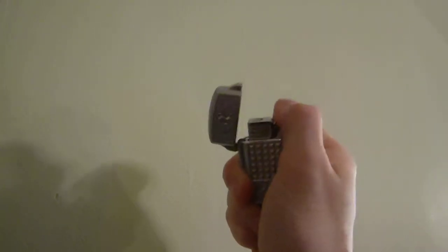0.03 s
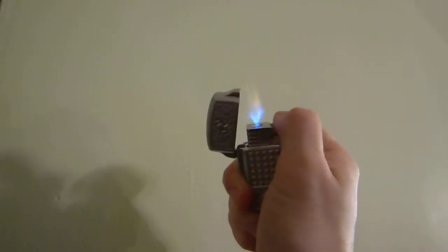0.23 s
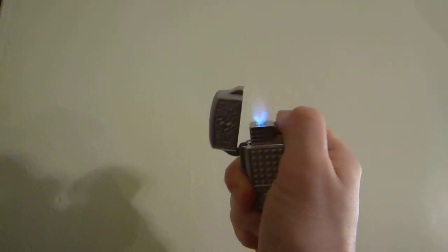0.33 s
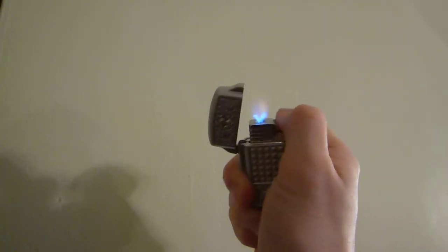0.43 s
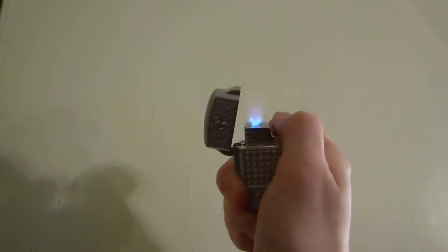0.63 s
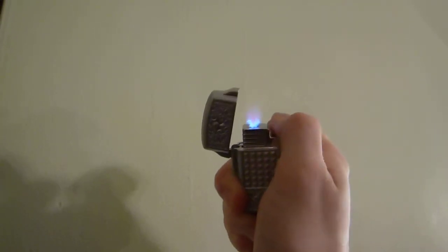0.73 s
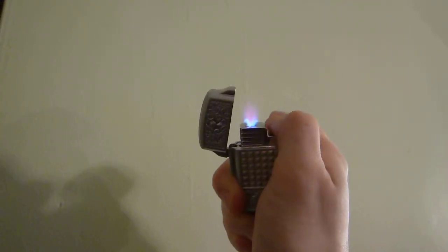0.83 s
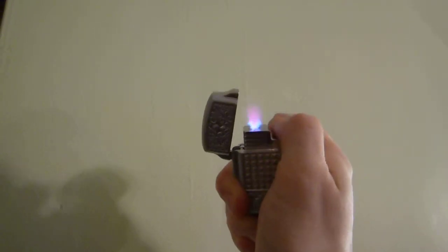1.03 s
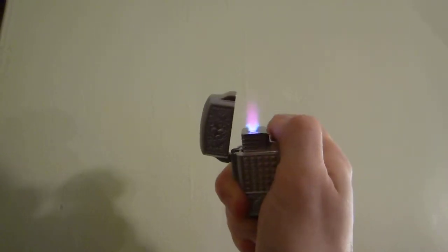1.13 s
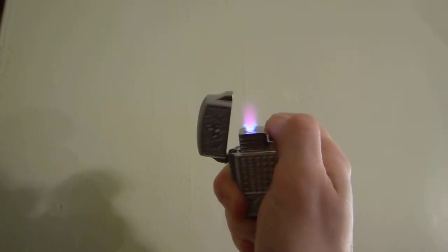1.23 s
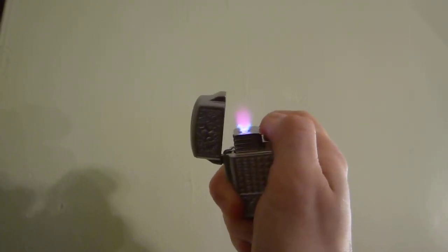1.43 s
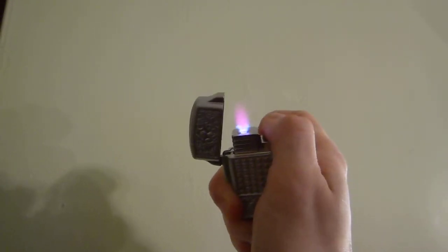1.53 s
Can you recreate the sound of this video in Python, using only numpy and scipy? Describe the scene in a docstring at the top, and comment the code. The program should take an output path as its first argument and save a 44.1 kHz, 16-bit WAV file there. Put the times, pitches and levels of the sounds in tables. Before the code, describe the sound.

A metal jet lighter is lit close to the microphone in a small room. Faint gas hisses at first. At 0.2 seconds the igniter gives one loud, sharp metallic click with a short room echo. The flame catches at once, flares briefly and settles by about 0.5 seconds into a steady, much quieter hiss over a soft, hollow, fluttering roar with tiny sputters, lasting until about 1.6 seconds.

```python
"""A metal jet lighter, close to the microphone, in front of a wall in a small room. First unlit gas hisses
over the low room tone. At 0.2 s the piezo igniter snaps and rings the case; wall, hand and room throw
the snap back, and the narrow-band recorder overloads, ducks and recovers. The flame catches, flares
a little and settles into a fluttering roar under the hiss of the jet."""
import sys
import numpy as np
from scipy import signal
from scipy.fft import rfft, irfft
from scipy.io import wavfile
from scipy.ndimage import uniform_filter1d

SR = 44100
rng = np.random.default_rng(int(sys.argv[2]) if len(sys.argv) > 2 else 0)


def pcm_store(signal):
    """Save signal as 16-bit PCM."""
    levels = np.round(np.clip(np.atleast_2d(signal), -1, 1) * 32767)
    wavfile.write(sys.argv[1], SR, levels.astype(np.int16).T)


N = 70560
TIME = np.arange(N) / SR

SNAP_S, SNAP_DB = .1997, .5   # the igniter's hammer strikes
CATCH_S = .033   # time constant: gas hiss gives way to flame
GAS_DB, ROAR_DB, JET_DB = -48.5, -44.5, -42.5

# modes of the metal case, one list each: f/Hz, level/dB re the snap, t60/s
CASE_MODE_HZ = [2100, 2295, 2430, 2845, 3135, 3360, 3772, 4130, 4928, 5190, 5700, 7220, 7680]
CASE_MODE_DB = [-16.5, -24, -20, -15, -15, -9, 0.5, -29.5, -15, -18.5, -21.5, -9, -7.5]
CASE_MODE_T60_S = [.022, 0.047, 0.013, .022, 0.036, .018, 0.019, .015, 0.012, 0.029, .014, 0.0096, 0.0065]
# low jolt of the lighter in the hand: f/Hz, level/dB re the snap, t60/s
JOLT_MODES = [(120, -45, 0.0294), (215, -30, .025), (345, -26.5, 0.033)]
# noise colours of unlit gas, flame roar and burning jet: f/Hz, relative level/dB
GAS_SPECTRUM = [(500, -8), (800, -6.5), (1400, -7.5), (2050, 0.5), (2450, -5), (2750, -7.5), (3300, -9),
                (3800, 1), (4400, -17), (5300, -19.5), (6000, -7), (6600, -4), (7750, -9), (9000, -15.5)]
ROAR_SPECTRUM = [(60, -16.5), (100, -17), (150, -2), (210, 2), (300, -4.5), (450, 1), (620, -2),
                 (750, -4.5), (900, -16.5)]
JET_SPECTRUM = [(700, -6), (950, -4), (1300, -1), (1600, -1.5), (2100, 0), (2620, -12.5), (3100, -6),
                (3600, 0), (4120, -1.5), (4600, -17.5), (5350, -20), (5900, -12.5), (6400, -13),
                (7050, -21.5), (7450, -18), (8300, -24), (9000, -31.5)]
# strength of the roar: t/s, level/dB re steady burning
ROAR_CURVE = [(.2, 15), (.26, 4), (.33, 1.5), (.39, 3.5), (.425, 1.5), (.5, 1), (.56, -3), (.63, -4),
              (.675, 1.5), (.8, 1.5), (1.1, -1), (1.16, 2), (1.25, -3.5), (1.31, 2), (1.365, -3),
              (1.42, -1), (1.6, -1)]
# strength of the jet's top hiss: t/s, relative level/dB
TOP_HISS_CURVE = [(.3, 1), (.75, -0.5), (.9, -0.5), (1.03, -3), (1.17, 1), (1.6, 0)]
# hollow resonances that the jet excites: f/Hz, width/Hz, level/dB at steady burning
HOLLOW_BANDS = [(345.4, 105, -45.5), (569.3, 65, -51), (770, 75, -55.5), (969, 50, -56.5), (1157, 60, -55),
                (1323, 49, -56), (2300, 90, -65.5)]
# sputters of the flame: t/s, f/Hz, level/dB, half length/s
SPUTTERS = [(0.312, 200, -40.5, .01), (.318, 400, -39.5, 0.013), (0.457, 390, -34, 0.0065),
            (0.762, 75, -47.5, 0.0073), (0.874, 390, -35, 0.0093), (1.433, 342.6, -42, 0.041)]
# reflections off wall and hand: delay/s, level/dB re the direct snap
REFLECTIONS = [(.0053, -12.5), (.0074, -19.5)]
# noise colours of the reverberation and the room tone: f/Hz, relative level/dB
REVERB_SPECTRUM = [(300, -36.5), (1000, -23), (2000, -10.5), (2450, -16), (2900, -4.5), (3400, 1.5),
                   (3780, 2.5), (4100, -9.5), (4500, -16.5), (4900, -12), (5200, -15.5), (5650, -12),
                   (6050, -22.5), (6900, -12), (7350, -10), (7950, -22.5), (8300, -20.5), (9000, -25)]
ROOM_TONE_SPECTRUM = [(20, -13), (40, -16), (65, -3.5), (90, -5), (120, 0.5), (165, -3), (230, 2.5),
                      (330, -1), (600, -8)]


def igniter(crack_db=-9.5):
    """Blow and spark give a broad crack; the case rings and jolts in the hand."""
    burst = rms_one(low_pass(rng.standard_normal(N), hz=6860))
    crack = from_db(crack_db) * burst * dying(t60=.01)
    case = ring(zip(CASE_MODE_HZ, CASE_MODE_DB, CASE_MODE_T60_S))
    return from_db(SNAP_DB) * (crack + case + ring(JOLT_MODES))


def ring(modes):
    """Damped sines of alternating sign, set off by the snap."""
    return sum((-1) ** k * from_db(db) * dying(t60) * np.sin(2 * np.pi * hz * since_snap())
               for k, (hz, db, t60) in enumerate(modes))


def burner():
    """Thin gas hiss until the spark; then the flame takes over."""
    lit = 1 - np.exp(-since_snap() / CATCH_S)
    gas = from_db(GAS_DB) * noise(GAS_SPECTRUM)
    return (1 - lit) * gas + lit * (roar() + jet()) + sputters()


def roar(flutter_db=.78):
    """The flame's low noise and hollow resonances swell and flutter together."""
    strength_db = np.interp(TIME, *np.transpose(ROAR_CURVE)) + flutter_db * drift(hz=28)
    rumble = from_db(ROAR_DB) * noise(ROAR_SPECTRUM)
    hollows = sum(from_db(db) * hollow(hz, width) for hz, width, db in HOLLOW_BANDS)
    return from_db(strength_db) * (rumble + hollows)


def hollow(hz, width, waver_share=.015):
    """A narrow, noisy resonance whose centre wavers; rms 1."""
    phase = 2 * np.pi * np.cumsum(hz * (1 + waver_share * drift(hz=6.05))) / SR
    return rms_one(drift(width / 2) * np.cos(phase) + drift(width / 2) * np.sin(phase))


def jet(top_above_hz=4700, sag_db_per_s=.5):
    """The burning jet starts strong and settles; its top hiss slowly wavers."""
    hiss = noise(JET_SPECTRUM)
    top = irfft(rfft(hiss) * (np.fft.rfftfreq(N, 1 / SR) > top_above_hz), N)
    top_gain = from_db(np.interp(TIME, *np.transpose(TOP_HISS_CURVE)))
    flare_db = np.interp(TIME, [.475, .507], [2, 0])
    level_db = JET_DB + flare_db - sag_db_per_s * (TIME - TIME.mean())
    return from_db(level_db) * (hiss - top + top * top_gain)


def sputters():
    """At each sputter the flame briefly swells on one low pitch."""
    sound = np.zeros(N)
    for at_s, hz, db, half_length_s in SPUTTERS:
        swell = np.exp(-.5 * ((TIME - at_s) / half_length_s) ** 2)
        sound += from_db(db) * swell * np.sin(2 * np.pi * (hz * TIME + rng.random()))
    return sound


def with_reflections(snap):
    """The direct snap, then its bounces off the nearby wall and hand."""
    return snap + sum(from_db(db) * np.interp(TIME - delay, TIME, snap, left=0)
                      for delay, db in REFLECTIONS)


def room_tail(level_db=-21.5, build_s=.019):
    """The snap's diffuse reverberation builds up and dies in the small room."""
    build = 1 - np.exp(-since_snap() / build_s)
    return from_db(level_db) * noise(REVERB_SPECTRUM) * build * dying(t60=.43)


def room_tone(level_db=-54):
    """The room's steady low background."""
    return from_db(level_db) * noise(ROOM_TONE_SPECTRUM)


def from_db(db):
    """Decibels to gain."""
    return 10 ** (np.asarray(db) / 20)


def rms_one(x):
    """Scale to rms 1."""
    return x / np.sqrt(np.mean(x ** 2) + 1e-20)


def low_pass(x, hz, order=2):
    """Butterworth low-pass."""
    return signal.sosfilt(signal.butter(order, hz, fs=SR, output="sos"), x)


def noise(spectrum):
    """Noise of a given colour, falling 60 dB an octave beyond its ends; rms 1."""
    hz, db = np.transpose(spectrum)
    octave, known = np.log2(np.fft.rfftfreq(N, 1 / SR) + 1), np.log2(hz)
    beyond = np.abs(octave - np.clip(octave, known[0], known[-1]))
    gain = from_db(np.interp(octave, known, db) - 60 * beyond)
    return rms_one(irfft(rfft(rng.standard_normal(N)) * gain, N))


def drift(hz):
    """Random wander, mostly slower than hz; rms 1."""
    return rms_one(low_pass(rng.standard_normal(2 * N), hz)[N:])


def since_snap():
    """Seconds since the snap, zero before it."""
    return np.maximum(TIME - SNAP_S, 0)


def dying(t60):
    """Envelope that starts at the snap and falls 60 dB in t60 seconds."""
    return (TIME > SNAP_S) * from_db(-60 * since_snap() / t60)


def scene():
    """Lighter, reflections and room as they reach the microphone, in mono."""
    return (with_reflections(igniter()) + burner() + room_tail() + room_tone())[None]


def gain_control(x, threshold_db=-19.5, duck_share=.54, attack_s=.01, recover_db_per_s=108):
    """The recorder ducks quickly on a loud sound and climbs back at a steady rate."""
    level_db = 10 * np.log10(np.abs(uniform_filter1d(x ** 2, size=64)) + 1e-12)
    duck_db = duck_share * np.maximum(level_db - threshold_db, 0)
    recovery_db = recover_db_per_s * TIME
    held_db = np.maximum.accumulate(duck_db + recovery_db) - recovery_db
    pole = np.exp(-1 / (attack_s * SR))
    return x * from_db(-signal.lfilter([1 - pole], [1, -pole], held_db))


def record(dry, mic_top_hz=8100, clip_level=.74, cutoff_hz=16000):
    """Narrow-band microphone, gain control, soft overload and a steep top cut."""
    ducked = gain_control(low_pass(dry[0], mic_top_hz, order=14))
    clipped = ducked / (1 + (ducked / clip_level) ** 6) ** (1 / 6)
    top_cut = signal.cheby2(12, 70, cutoff_hz, fs=SR, output="sos")
    return signal.sosfilt(top_cut, clipped)[None]


dry = scene()
out = record(dry)
pcm_store(out)
```